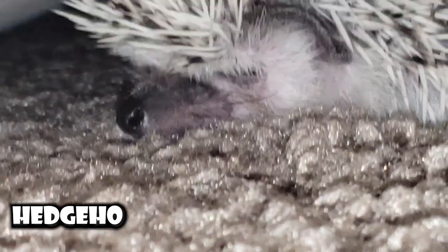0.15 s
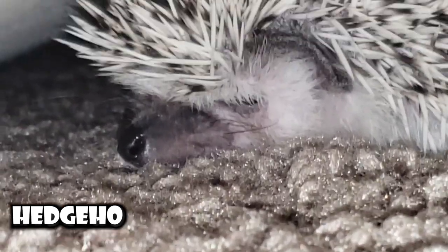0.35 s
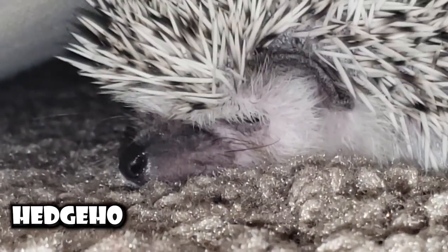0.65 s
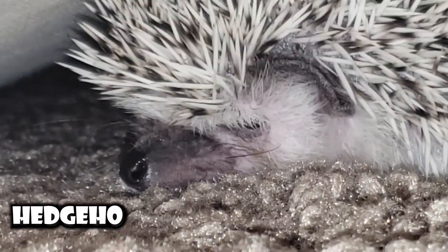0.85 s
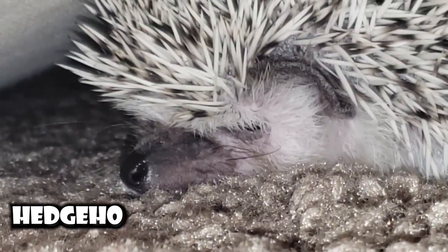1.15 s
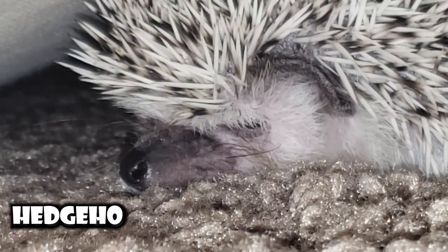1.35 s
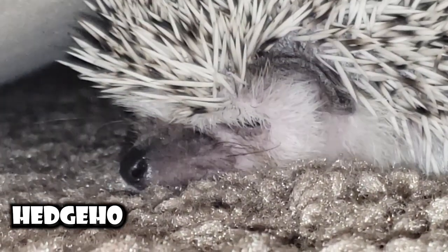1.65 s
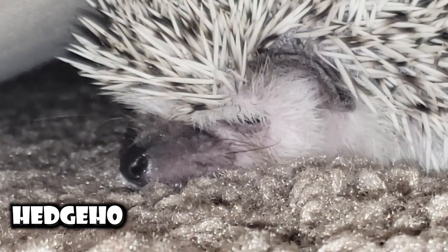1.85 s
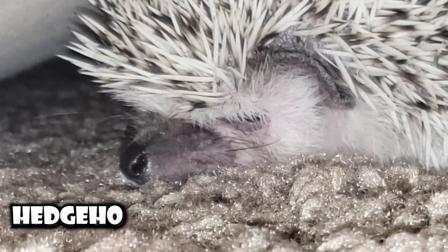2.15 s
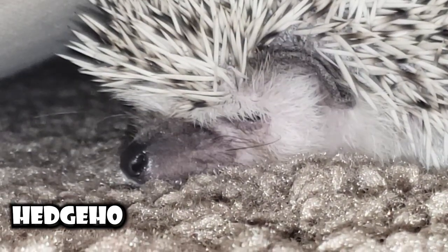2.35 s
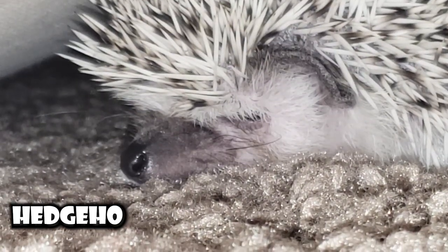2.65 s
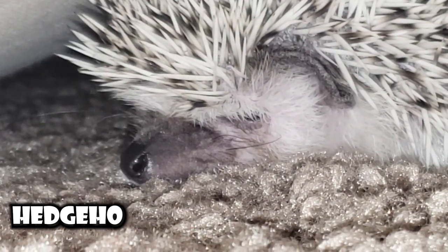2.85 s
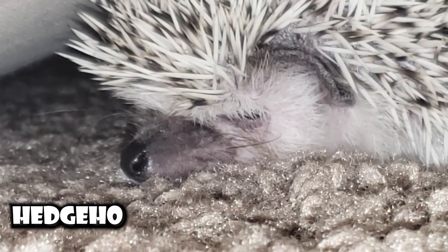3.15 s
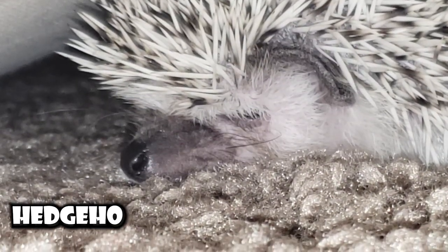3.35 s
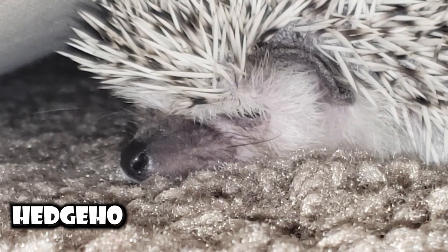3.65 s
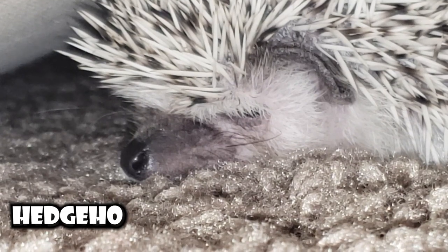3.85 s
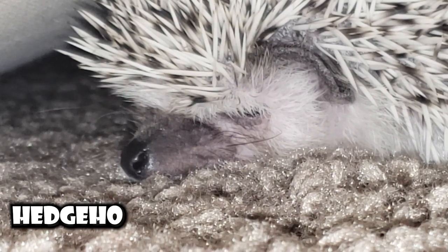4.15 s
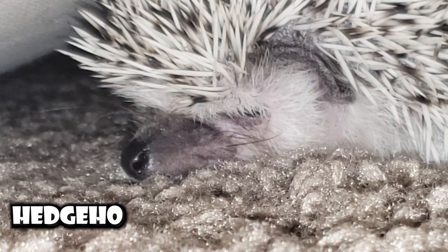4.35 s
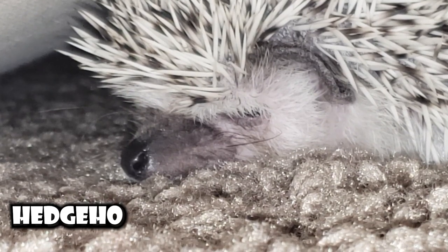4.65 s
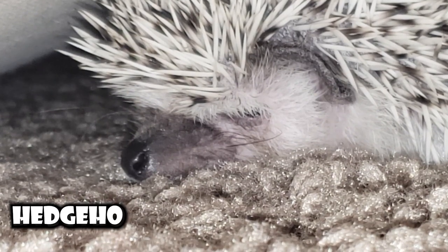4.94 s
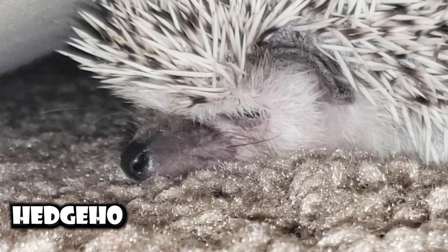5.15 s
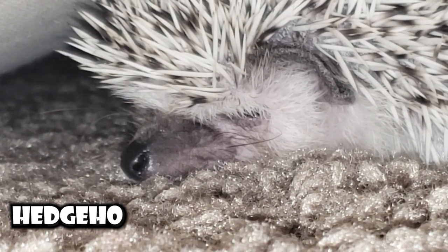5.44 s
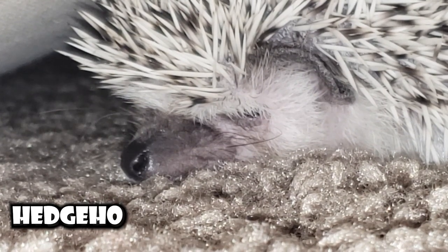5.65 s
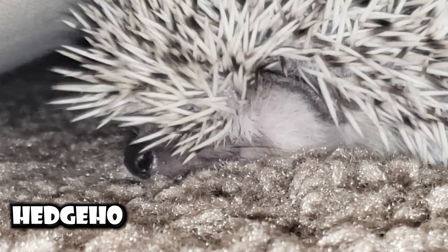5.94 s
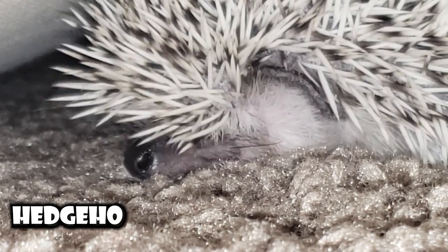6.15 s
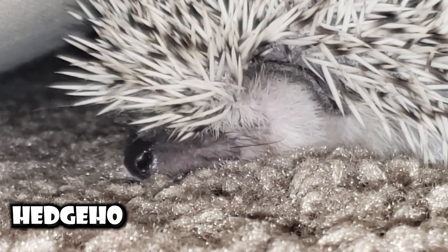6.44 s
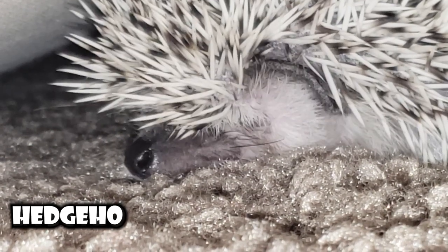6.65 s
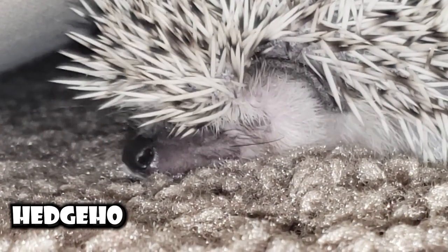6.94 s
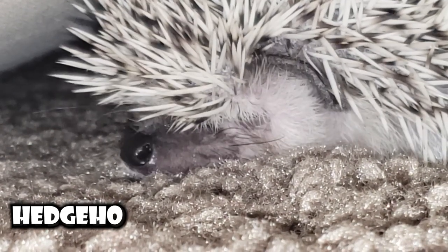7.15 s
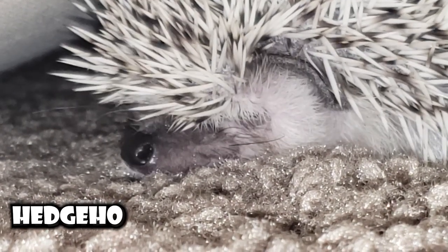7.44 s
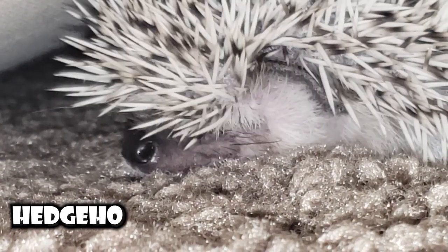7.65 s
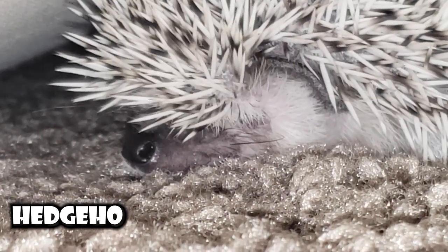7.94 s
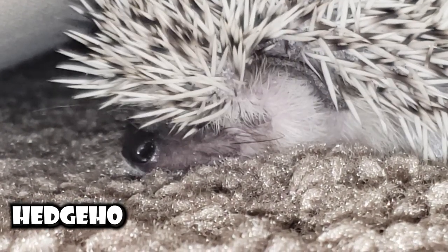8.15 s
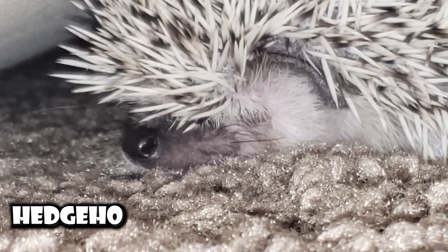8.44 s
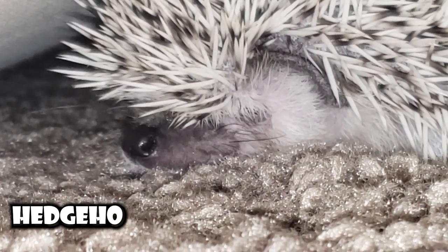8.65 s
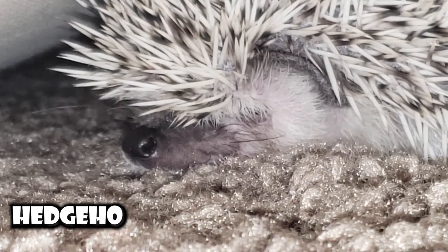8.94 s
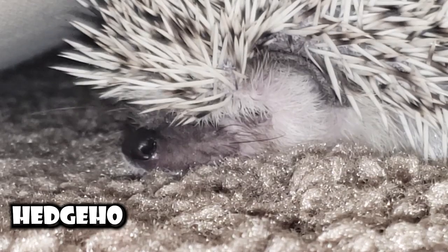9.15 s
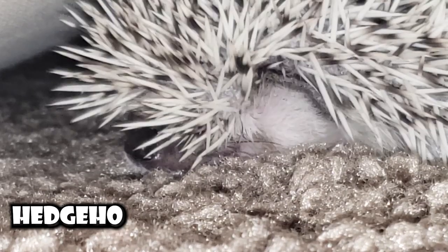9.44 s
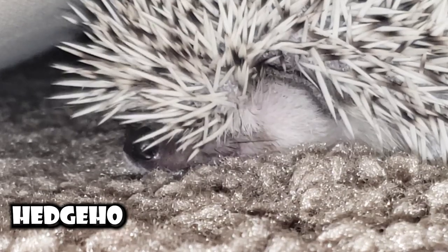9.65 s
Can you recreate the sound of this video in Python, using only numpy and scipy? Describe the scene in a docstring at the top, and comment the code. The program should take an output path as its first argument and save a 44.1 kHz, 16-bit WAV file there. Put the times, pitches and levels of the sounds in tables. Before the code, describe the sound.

A hedgehog huffs through its nose right at the microphone in a carpeted room. The short, sharp puffs come about three a second, each a hiss with a rough low flutter. Between them it draws soft breaths, and its spines rustle and tick lightly. The puffs slow a little, then stop with a brief prickly rustle. A dull rumble and low machine throb continue underneath.

```python
"""A carpeted room, one microphone close to a hedgehog that huffs through its nose.
Each puff is a nostril hiss over the rough low flutter of soft tissue flapping in the air stream.
Between puffs it draws soft breaths and shifts its body; the spines rustle and tick on the carpet.
Behind it lie a dull room rumble and a faint hiss, and the rotor of a machine throbs far below."""
import sys
import numpy as np
from scipy import signal
from scipy.fft import rfft, irfft, next_fast_len
from scipy.io import wavfile

SR = 44100
rng = np.random.default_rng(int(sys.argv[2]) if len(sys.argv) > 2 else 0)


def persist_wave(psi):
    """Save psi, clipped to +-1, as 16-bit WAV."""
    counts = np.round(np.clip(psi, -1, 1) * 32767).astype(np.int16)
    wavfile.write(sys.argv[1], SR, np.atleast_2d(counts).T)


N = 431738

# puffs: t/s, length/s, hiss peak/dB, fade by the end/dB, flutter level/dB
PUFFS = [(0.0, 0.069, -34.5, 7.5, -32.5), (0.216, 0.12, -34.5, 2.5, -32), (0.342, 0.051, -48, 4.5, -48.5),
         (0.643, 0.13, -34.5, 11, -33), (0.977, 0.11, -35, 10.5, -34), (1.206, 0.11, -36.5, 8, -33),
         (1.467, 0.085, -39.5, 5.5, -33.5), (1.741, 0.093, -38.5, 8.5, -34),
         (2.003, 0.054, -42.5, 1.5, -35.5), (2.305, 0.059, -55, 1.5, -51.5),
         (2.498, 0.021, -58.5, 1.5, -37), (2.634, 0.13, -42, 7, -37), (2.882, 0.099, -38, 6.5, -34),
         (3.131, 0.071, -40, 5.5, -35.5), (3.321, 0.066, -36, 8, -32.5), (3.598, 0.093, -39.5, 5, -36),
         (3.881, 0.14, -33.5, 7.5, -31), (4.267, 0.071, -50, 1.5, -45.5), (4.634, 0.12, -35.5, 13.5, -34),
         (4.896, 0.12, -33.5, 3.5, -32.5), (5.248, 0.12, -33.5, 7, -32), (5.455, 0.084, -36, 3.5, -32.5),
         (5.703, 0.127, -32.5, 3, -31), (5.837, 0.12, -45.5, 5.5, -47.5), (6.132, 0.16, -33.5, 10, -33),
         (6.538, 0.13, -36.5, 10, -34.5), (6.875, 0.1, -39.5, 10.5, -36.5), (7.128, 0.1, -36, 6.5, -35.5),
         (7.47, 0.13, -33.5, 7, -33), (7.933, 0.12, -35, 7, -33.5), (8.3, 0.14, -33, 7, -34.5),
         (8.711, 0.14, -32.5, 5, -33.5)]
# modes of the nasal passage: f/Hz, nominal width/Hz, level/dB
NOSE_MODES = [(1890, 800, 2.5), (3357, 1050, -2.5), (5444, 1340, -3), (7480, 1300, -5), (9760, 1700, -9.5),
              (11140, 890, -3), (12800, 1100, 0.5), (14200, 1700, -3)]
# head position: t/s, carpet notch f/Hz, gain/dB of the first, the third and the top three nose modes
HEAD_POSITION = [(0, 1150, -8.5, 1.5, -7), (1.2, 1217, -9.5, 2.5, -7.5), (1.5, 1410, -8, 0.5, -4),
                 (2.65, 1500, -15, 0.5, -6.5), (3.3, 1491, -4.5, 1.5, -11), (3.9, 1504, -5.5, 1, -11.5),
                 (4.64, 1712, -13, -1.5, -13), (5.45, 1266, -6.5, 3, -9.5), (6.141, 1485, -13.5, 0, -10),
                 (6.55, 1632, -27, 0.5, -14), (6.9, 1590, -12.5, 2.5, -8), (7.48, 2094, -18.5, -1.5, -14),
                 (7.95, 2592, -19, 2, -16.5), (8.72, 2750, -26, 2, -15)]
# spectrum of the soft noise in breaths and body shifts: f/Hz, relative level/dB
RUSTLE_SPECTRUM = [(710, -32), (1200, 7), (1320, -3), (1750, 6.5), (2480, 5), (7570, 7.5), (13700, 2),
                   (16000, -6)]
CHEST_HZ, CHEST_WIDTH_HZ = 257, 225
OVERHANG_S = .009   # a puff tapers off this long past its listed length


def from_db(db):
    """Decibels to gain."""
    return 10 ** (np.asarray(db) / 20)


def rms_one(x):
    """Scale to unit rms."""
    return x / np.sqrt(np.mean(x ** 2) + 1e-20)


def in_time(rows):
    """Columns of a curve table, one value a sample."""
    s, *columns = np.transpose(rows)
    return [np.interp(np.arange(N) / SR, s, c) for c in columns]


def drift(rate_hz):
    """Slow random wander with a spread of 1."""
    pole = np.exp(-80 * np.pi * rate_hz / SR)
    slow = signal.lfilter([1], [1, -2 * pole, pole * pole], rng.standard_normal(N // 40 + 2002))[2000:]
    return np.interp(np.arange(N) / 40, np.arange(len(slow)), rms_one(slow))


def coloured(spectrum):
    """Steady noise with the given spectrum; rms 1."""
    size = next_fast_len(N)
    hz, db = np.transpose(spectrum)
    bin_hz = np.arange(size // 2 + 1) * SR / size
    gain = from_db(np.interp(np.log(bin_hz + 1), np.log(hz), db))
    return rms_one(irfft(rfft(rng.standard_normal(size)) * gain, size)[:N])


def resonance(x, hz, width_hz):
    """Two-pole band with gain 1 on top."""
    r = np.exp(-np.pi * width_hz / SR)
    gain = (1 - r * r) / 2
    return signal.lfilter([gain, 0, -gain], [1, -2 * r * np.cos(2 * np.pi * hz / SR), r * r], x)


def swells(events, roundness):
    """One arch of gain for each event; low roundness flattens its top."""
    gain = np.zeros(N)
    for s, length, db in events:
        arch = np.hanning(round(length * SR)) ** roundness
        at = round(s * SR)
        gain[at:at + len(arch)] += from_db(db) * arch
    return gain


def spine_grains(per_s, spread_db):
    """Tiny random impulses from the spines, most weak and a few strong."""
    born = rng.random(N) < per_s / SR
    size = from_db(spread_db * np.minimum(rng.exponential(1, N), 4))
    return born * size * rng.choice([-1, 1], N)


def room_tone():
    """Dull room noise, a low rumble that swells and sinks, and the microphone's own hiss."""
    # spectra of the room and of the microphone hiss: f/Hz, relative level/dB
    room_spectrum = [(18, -15.5), (40, 7.5), (80, -1.5), (200, -10), (310, -21.5), (480, -22.5), (800, -19),
                     (1250, -23), (1700, -30), (3000, -42)]
    hiss_spectrum = [(1000, 3), (3500, 10), (10000, -13), (15500, -24)]
    # course of the rumble: t/s, level/dB
    rumble_course = [(0, -53.5), (1.5, -50), (2.4, -52), (3.5, -51.5), (8.2, -59), (9.79, -52)]
    room = from_db(-46 + 1.3 * drift(17)) * coloured(room_spectrum)
    hiss = from_db(-72) * coloured(hiss_spectrum)
    rumble = rms_one(resonance(resonance(rng.standard_normal(N), 97, 127), 97, 127))
    return room + hiss + from_db(in_time(rumble_course)[0] + 3.3 * drift(1.34)) * rumble


def machine_throb():
    """A slow, slightly unsteady rotor far below: two main orders and two faint higher ones."""
    # rotor: t/s, f/Hz, first order level/dB, second order level/dB
    rotor = [(0.0, 27.68, -33.5, -43), (1.1, 27.38, -35.5, -45.5), (1.35, 22.4, -44, -42),
             (1.55, 21.6, -43.5, -40), (1.7, 24.94, -41, -55), (2.0, 26.56, -39.5, -46),
             (2.35, 26.16, -40.5, -51), (2.45, 27.04, -36.5, -44.5), (3.05, 28.36, -32, -42.5),
             (3.4, 28.62, -33.5, -42), (3.95, 29, -32.5, -47), (4.15, 30.6, -30, -43.5),
             (4.85, 27.79, -31.5, -46), (6.1, 26.82, -33, -42), (9.79, 27.4, -32.5, -43.5)]
    # higher orders: multiple, level/dB against the first
    higher_orders = [(3, -25), (6, -30)]
    hz, first_db, second_db = in_time(rotor)
    phase = 2 * np.pi * np.cumsum(hz * (1 + .0063 * drift(2.7))) / SR
    out = from_db(first_db + .11 * drift(4)) * np.sin(phase)
    out += from_db(second_db + 1.9 * drift(10)) * np.sin(2 * phase + .59)
    for multiple, db in higher_orders:
        out += from_db(first_db + db + 1.1 * drift(.74)) * np.sin(multiple * phase)
    return np.sqrt(2) * out


def stir_level():
    """Gain of the rustle: breaths rise fast and fade; a last flinch pulls the spines forward."""
    # faint steady rustle: t/s, level/dB
    resting_stir = [(0, -78), (2.7, -66.5), (3.3, -76), (4.6, -70), (5.7, -67), (7.05, -87), (8.25, -70),
                    (9.79, -127)]
    # soft breaths drawn after a puff: t/s, length/s, level/dB
    breaths = [(0.06, 0.065, -58), (0.365, 0.082, -54.5), (1.307, 0.061, -49), (1.55, 0.12, -53),
               (1.839, 0.074, -60), (2.981, 0.11, -61), (3.197, 0.038, -57), (4.024, 0.04, -54.5),
               (4.33, 0.13, -57.5), (5.018, 0.096, -48.5), (5.543, 0.063, -46), (5.937, 0.079, -55),
               (6.295, 0.12, -61.5), (7.23, 0.11, -56), (7.603, 0.15, -52), (8.049, 0.11, -50.5),
               (8.436, 0.13, -47.5)]
    rise_s, breath_fade_db, flinch_s = .01, 10.5, 8.848
    t = np.arange(N) / SR
    power = from_db(in_time(resting_stir)[0]) ** 2
    for s, length, db in breaths:
        at = slice(round(s * SR), round((s + length) * SR))
        age = t[at] - s
        edges = np.minimum(np.minimum(age, length - age) / rise_s, 1)
        power[at] += (edges * from_db(db - breath_fade_db * age / length)) ** 2
    age = np.maximum(t - flinch_s, 0)
    flinch_db = -46.5 - 12 * age - 31 * np.maximum(age - .29, 0)   # sags, then dies away
    flinch = np.minimum(age / rise_s, 1) * from_db(flinch_db)
    return np.sqrt(power + flinch ** 2)


def rustle():
    """Patchy breath noise and clumped spine grains, both growing when the animal stirs."""
    level = stir_level()
    grains = spine_grains(per_s=70 * from_db(6.5 * drift(12)), spread_db=4.5)
    rings_hz = [3500, 4100, 4600, 5700, 8750, 11700]
    ring_of = rng.integers(0, len(rings_hz), N)
    crackle = sum(resonance(grains * (ring_of == k) + 1e-18, hz, .2 * hz) * (4000 / hz) ** .7
                  for k, hz in enumerate(rings_hz))
    air = from_db(1.3 * drift(25)) * coloured(RUSTLE_SPECTRUM)
    nasal = sum(from_db(-15.5 + 10 * drift(9.2)) * resonance(air, hz, width_hz)
                for hz, width_hz, _ in NOSE_MODES[:5])
    return level * rms_one(air + nasal) + (from_db(-84) + .2 * level) * rms_one(crackle)


def body_shifts():
    """The body shifts on the carpet: dense clumped grains ring in the spines, over soft noise."""
    # movements: t/s, length/s, level/dB
    movements = [(0.093, 0.36, -55.5), (0.45, 0.051, -62), (0.494, 0.12, -58.5), (0.869, 0.12, -55.5),
                 (1.576, 0.063, -57), (1.935, 0.052, -58), (2.069, 0.05, -62), (2.181, 0.1, -60),
                 (2.454, 0.068, -57), (3.405, 0.086, -58), (3.71, 0.048, -58), (5.189, 0.053, -63),
                 (7.86, 0.084, -63), (9.096, 0.055, -48), (9.544, 0.029, -54.5)]
    # spine resonances: f/Hz, width/Hz, relative level/dB
    rings = [(3500, 1100, 0.5), (4100, 450, 1.5), (6000, 1500, -5.5), (9200, 2500, 1)]
    grains = spine_grains(per_s=900 * from_db(5 * drift(40)), spread_db=3.2)
    ring_of = rng.integers(0, len(rings), N)
    crackle = sum(from_db(db) * rms_one(resonance(grains * (ring_of == k) + 1e-18, hz, width_hz))
                  for k, (hz, width_hz, db) in enumerate(rings))
    scuff = from_db(1.5) * rms_one(crackle) + from_db(-5.5) * coloured(RUSTLE_SPECTRUM)
    return swells(movements, roundness=.5) * scuff


def spine_ticks():
    """A spine ticks with a ring of a few cycles and a short broad snap; weaker slips surround it."""
    # ticks: t/s, peak level/dB before the low cut, ring f/Hz, snap level/dB against the ring
    ticks = [(0.136, -35, 3500, -8), (0.186, -35.5, 6300, -11), (0.485, -34.5, 6000, 1),
             (0.525, -25.5, 8900, 1), (0.61, -33, 8300, 3), (0.7776, -26.5, 11000, -6),
             (0.8053, -34, 10140, 1), (0.8224, -35, 4100, -2), (0.874, -32, 5370, -1),
             (0.8935, -27, 3750, -2), (0.9003, -25, 4060, -3), (0.9354, -37, 4100, 6),
             (0.9393, -33, 4040, -19), (0.957, -28, 3970, -1), (1.303, -24, 9010, 11),
             (1.3548, -30, 13680, -6), (1.3698, -30.5, 3300, -8), (1.37, -21, 9500, 12),
             (1.386, -36, 6940, -2), (1.6054, -31, 8900, 3), (1.639, -33.5, 4600, -5), (1.93, -35, 4200, 1),
             (2.0837, -37.5, 3280, -2), (2.1486, -30.5, 9780, 1), (2.21, -29, 5430, 10),
             (2.2455, -32, 5250, 0), (2.2724, -37, 4310, -2.5), (2.3355, -39, 8600, -8),
             (2.4623, -37, 4310, -3), (2.4707, -39, 4760, -6), (3.4387, -39, 4600, -10),
             (3.469, -35, 4190, 2), (3.868, -44, 5000, 9), (4.0901, -33.5, 5070, 10),
             (4.219, -38, 1900, -13), (4.227, -36, 6500, 13), (4.8568, -37, 10000, -2),
             (5.069, -39, 11550, 3), (5.2155, -39.5, 9490, 6), (6.1259, -35, 6560, 14),
             (7.016, -39.5, 6510, 0), (7.2644, -31, 8370, 13), (7.7248, -33, 7960, 2),
             (8.108, -30, 6080, -2), (8.1856, -38, 8300, -2), (8.876, -23, 8800, -1),
             (8.988, -21.5, 3830, -0.5), (8.9956, -17.5, 8400, -1), (9.0478, -26, 7800, -4),
             (9.069, -31, 8260, 8), (9.1334, -31.5, 7490, 3)]
    out, t = np.zeros(N + 1000), np.arange(300) / SR
    slip_draws = rng.random((len(ticks), 4, 2))
    bursts = rng.standard_normal((len(ticks), len(t)))
    for (s, db, hz, snap_db), slips, burst in zip(ticks, slip_draws, bursts):
        decay_s = .00042 * from_db(-.6 * snap_db)   # a snappier tick rings shorter
        ring = np.sin(2 * np.pi * hz * t) * np.exp(-t / decay_s) * np.minimum(t * hz, 1)
        snap = resonance(burst * t * np.exp(-t / .00015), hz, 1.1 * hz)
        tick = ring + from_db(snap_db) * rms_one(snap) * np.std(ring)
        tick *= from_db(db) / np.max(np.abs(tick))
        at = round((s - .0003) * SR)
        out[at:at + len(t)] += tick
        for lag, size in slips:
            slip = at + round((.0031 * lag - .002) * SR)
            out[slip:slip + len(t)] += .19 * size * tick
    return signal.sosfilt(signal.butter(3, 2100, "high", fs=SR, output="sos"), out[:N])


def sighs():
    """Lumpy air sounds faintly in the chest resonance after some puffs."""
    # low breaths: t/s, length/s, level/dB
    low_breaths = [(1.553, 0.041, -47), (2.976, 0.085, -47), (5.015, 0.057, -51), (5.548, 0.046, -47),
                   (8.438, 0.036, -44), (8.857, 0.2, -51.5)]
    air = resonance(rng.standard_normal(N), CHEST_HZ, .71 * CHEST_WIDTH_HZ)
    air = rms_one(resonance(air, CHEST_HZ, 690))
    return swells(low_breaths, roundness=.054) * from_db(.6 * drift(35)) * air


def puff_controls():
    """Gate, hiss level, flutter level and random nose-mode offsets: each puff swells, then fades."""
    rise_s, fall_s, swell_db_per_s = .013, .029, 70
    gate, hiss_db, flutter_db = np.zeros(N), np.full(N, -60.), np.full(N, -60.)
    modes_db = np.zeros((len(NOSE_MODES), N))
    offsets_db = rng.normal(0, 1, (len(PUFFS), len(NOSE_MODES)))
    for (s, length, peak, fade, flutter), own_db in zip(PUFFS, offsets_db):
        t = np.arange(round((length + OVERHANG_S) * SR)) / SR
        at = slice(round(s * SR), round(s * SR) + len(t))
        open_share = np.clip((length + OVERHANG_S - t) / fall_s, 0, 1)
        rise = np.clip(t / rise_s, 0, 1) if s > .01 else 1   # the first puff is already under way
        gate[at] = rise * open_share ** 2
        peak_s = .4104 * length
        fading = np.clip((t - peak_s) / max(length - fall_s - peak_s, .001), 0, 1)
        hiss_db[at] = peak - swell_db_per_s * np.maximum(peak_s - t, 0) - fade * fading
        flutter_db[at] = flutter + 1 + .5 * (hiss_db[at] - peak)   # follows effort half as steeply
        modes_db[:, at] = own_db[:, None]
    return gate, hiss_db, flutter_db, modes_db


def nose_flutter(hiss_db, puffing):
    """Soft tissue flaps unevenly, faster with more effort; flaps and a little air fill a low band."""
    count, jitter = int(N / SR * 600), .22
    flap_hz = 310.1 * from_db(.12 * (hiss_db + 35))
    cycles = np.cumsum(flap_hz) / SR
    due = np.cumsum(np.clip(1 + jitter * rng.standard_normal(count), .4, 2))
    at = np.searchsorted(cycles, due[due < cycles[-1]])
    flaps = np.zeros(N)
    flaps[at] = from_db(rng.standard_normal(count))[:len(at)]
    source = flaps / np.std(flaps[puffing]) + from_db(-6.5) * rng.standard_normal(N)
    band = np.vstack([signal.butter(2, 201, "high", fs=SR, output="sos"),
                      signal.butter(1, 560, fs=SR, output="sos"),
                      signal.cheby1(3, 1.5, 1068, fs=SR, output="sos")])
    flutter = signal.sosfilt(band, source)
    return flutter / np.std(flutter[puffing])


def nostril_hiss(offsets_db):
    """An uneven air stream excites the nose modes; each wanders, and some follow the head position."""
    # slow change of nose colour: t/s, gain/dB of the second mode, gain/dB of the fourth and fifth
    nose_colour = [(0, -1, 0), (2.5, -1.5, 0), (3.9, -2, -1.5), (5, -2.5, 1), (6.15, -0.5, -0.3),
                   (6.8, 2, 0.5), (7.5, -2.5, -0.5), (8.8, -3.5, -1)]
    # side cavities that swallow a band each: f/Hz, width/Hz, share swallowed
    cavities = [(2900, 360, 0.12), (6300, 710, 0.48), (10850, 410, 0.4)]
    _, first, third, top = in_time(HEAD_POSITION)
    second, upper = in_time(nose_colour)
    modes_db = offsets_db + np.array([first, second, third, upper, upper, top, top, top])
    hiss = 0
    for (hz, width_hz, db), own_db in zip(NOSE_MODES, modes_db):
        air = resonance(rng.standard_normal(N), hz, 1.35 * width_hz)
        air = rms_one(resonance(air, hz, 1.35 * width_hz))
        hiss += from_db(db + own_db + 1.2 * drift(11.8)) * air
    for hz, width_hz, share in cavities:
        hiss -= share * resonance(hiss, hz, width_hz)
    return hiss * from_db(drift(52))   # 1 dB of sputter


def carpet_reflection(direct):
    """The bounce off the carpet partly cancels one band of each puff, set by the height of the head."""
    out = direct.copy()
    times, notch_hz, *_ = np.transpose(HEAD_POSITION)
    for s, length, *_ in PUFFS:
        at = slice(round(s * SR), round((s + length + OVERHANG_S) * SR))
        out[at] -= .71 * resonance(direct[at], np.interp(s, times, notch_hz), width_hz=540)
    return out


def puffs():
    """Huffs right at the microphone: nostril hiss over flutter that resonates in the chest."""
    gate, hiss_db, flutter_db, offsets_db = puff_controls()
    puffing = gate > .5
    flutter = nose_flutter(hiss_db, puffing)
    chest = resonance(flutter, CHEST_HZ, CHEST_WIDTH_HZ)
    chest_db = -13 + np.clip(-.6 * (hiss_db + 35.5), -3, 9)   # weak puffs sound chestier
    body = flutter + from_db(chest_db) * chest / np.std(chest[puffing])
    hiss = nostril_hiss(offsets_db) * (1 + .14 * np.roll(flutter, 5))   # air escapes with each flap
    return carpet_reflection(gate * (from_db(hiss_db) * hiss + from_db(flutter_db) * body))


def scene():
    """All sources reach one microphone, the same on both channels."""
    mono = room_tone() + puffs() + sighs() + rustle() + body_shifts() + spine_ticks() + machine_throb()
    return np.array([mono, mono])


def record(dry):
    """The top is cut steeply above 15.7 kHz."""
    return signal.sosfilt(signal.ellip(10, .2, 60, 15720, fs=SR, output="sos"), dry)


dry = scene()
out = record(dry)
persist_wave(out)
```